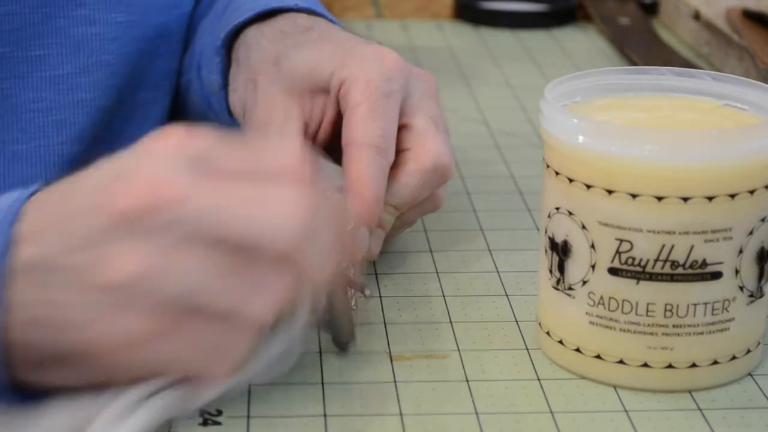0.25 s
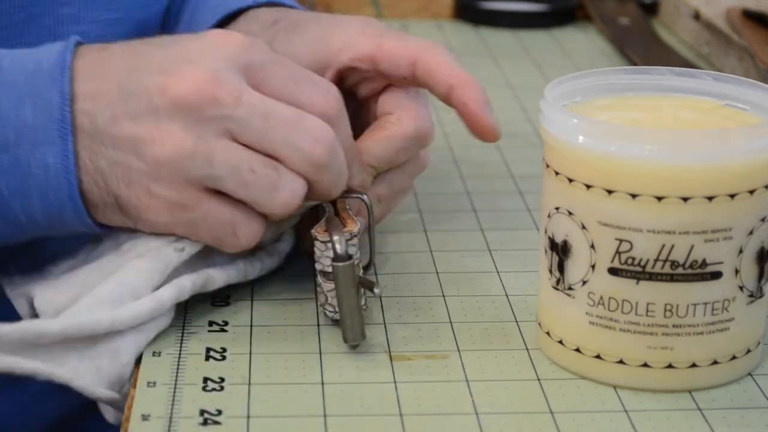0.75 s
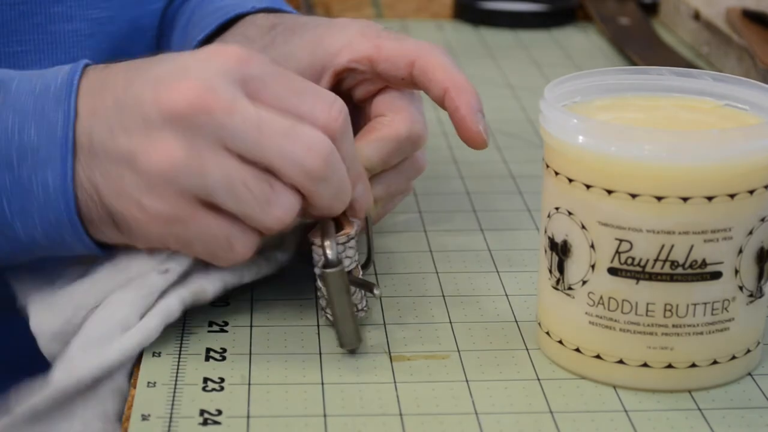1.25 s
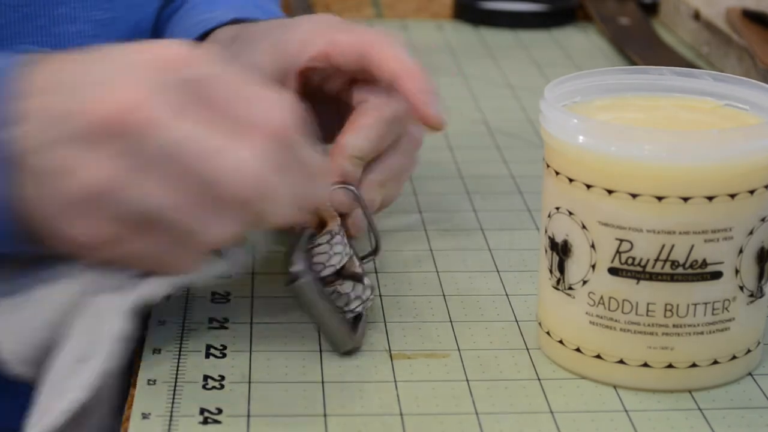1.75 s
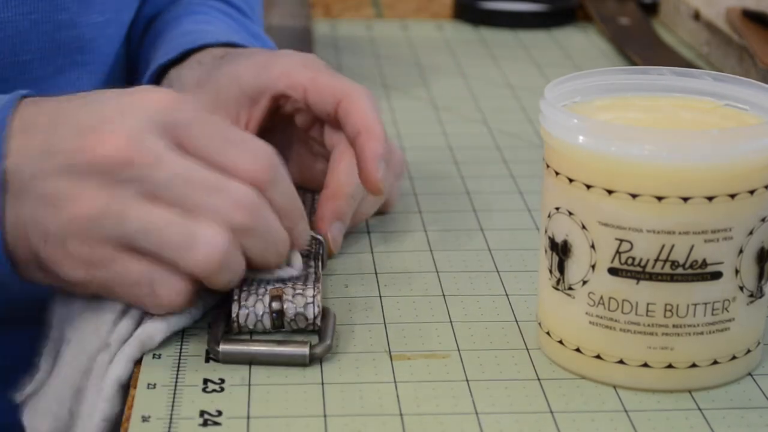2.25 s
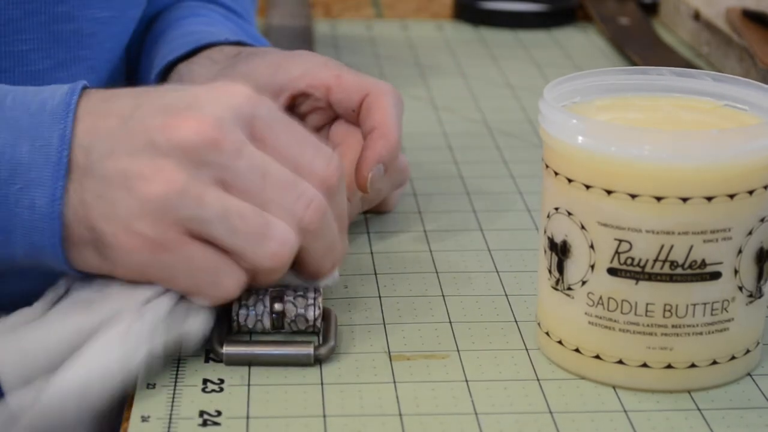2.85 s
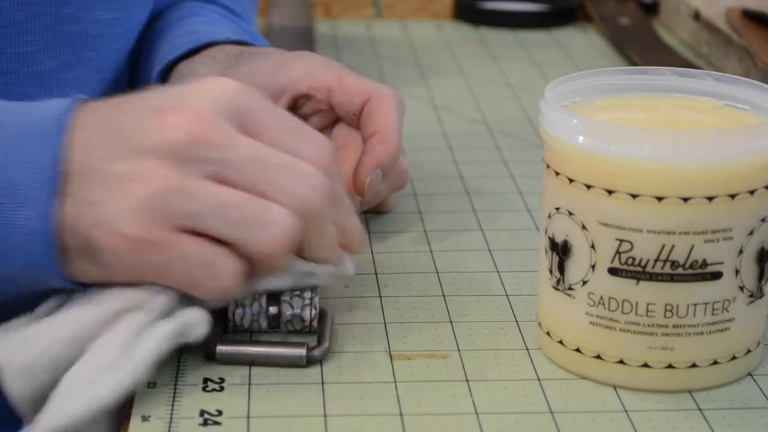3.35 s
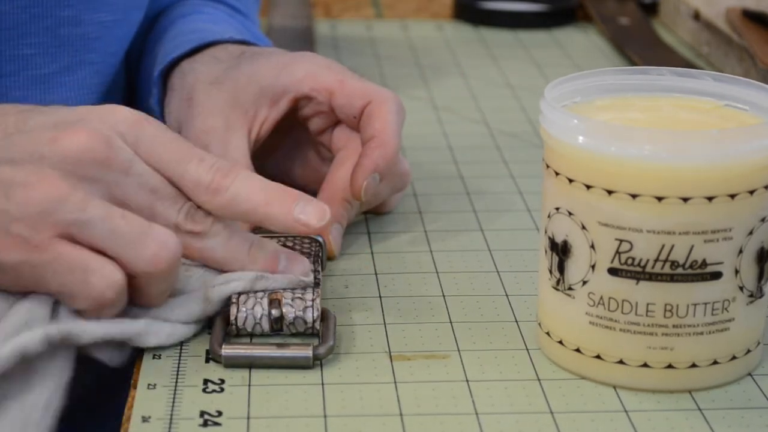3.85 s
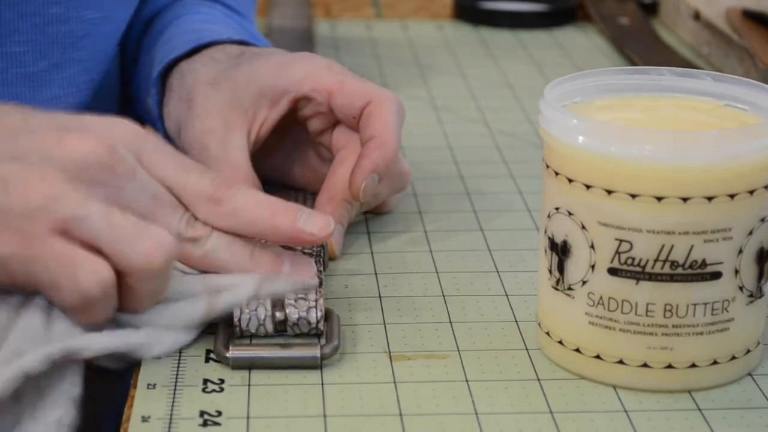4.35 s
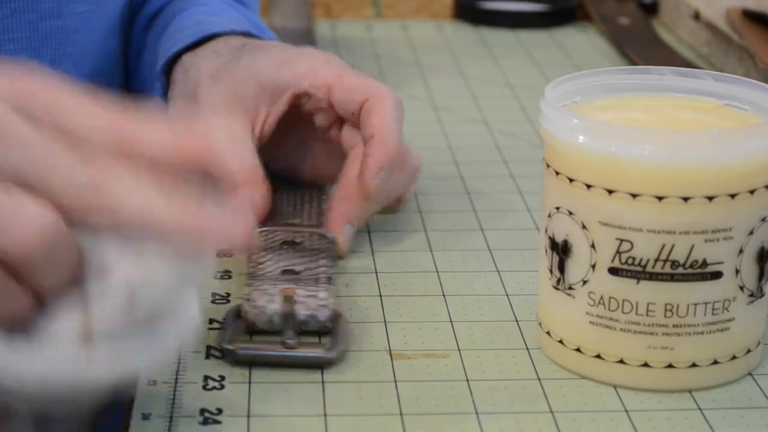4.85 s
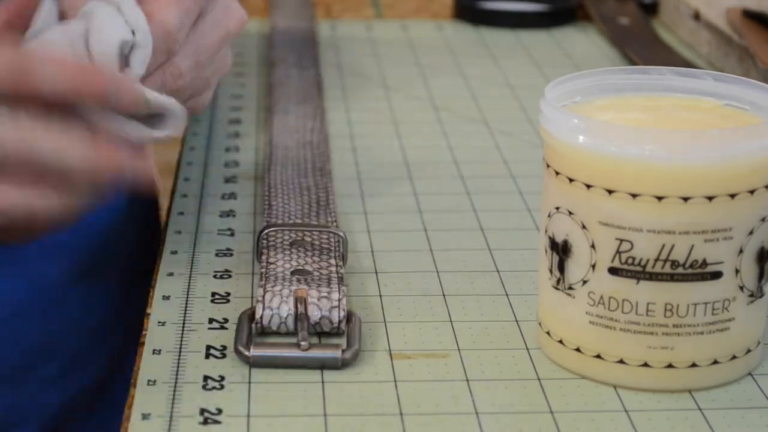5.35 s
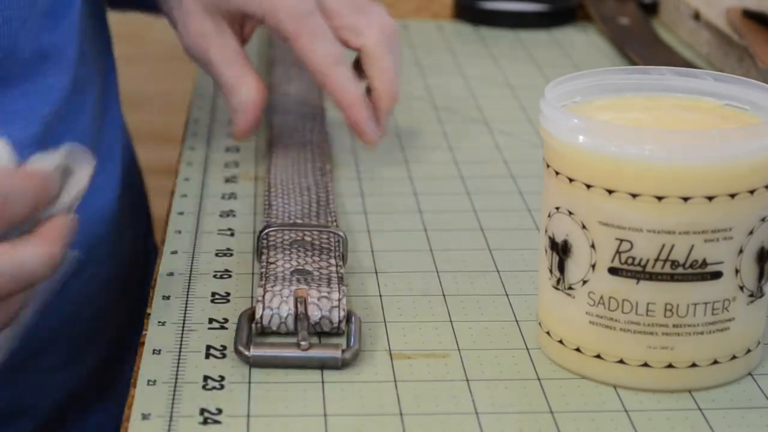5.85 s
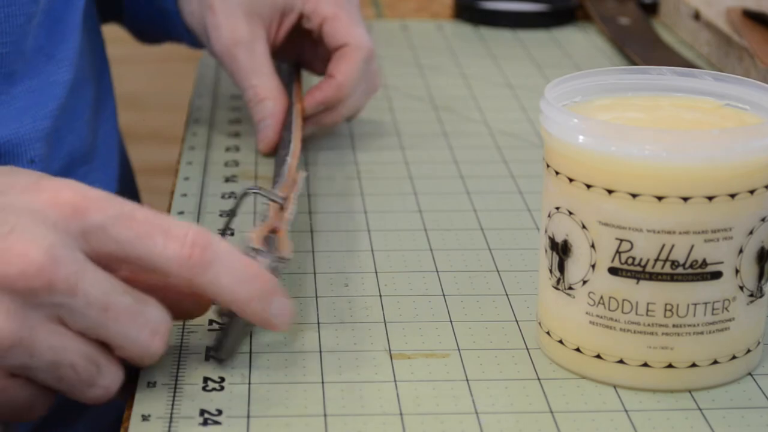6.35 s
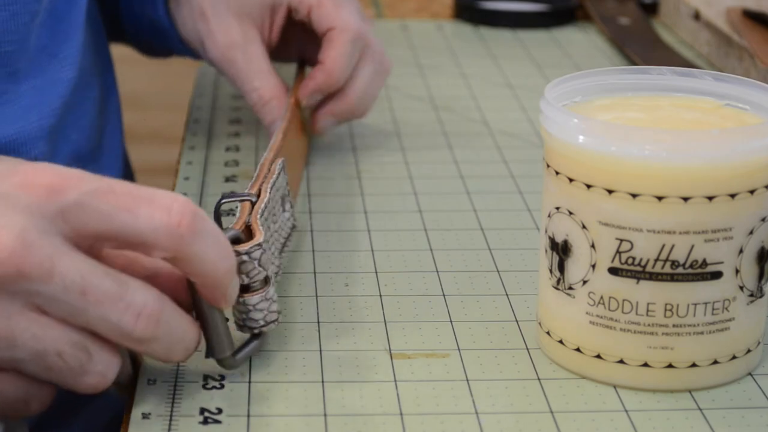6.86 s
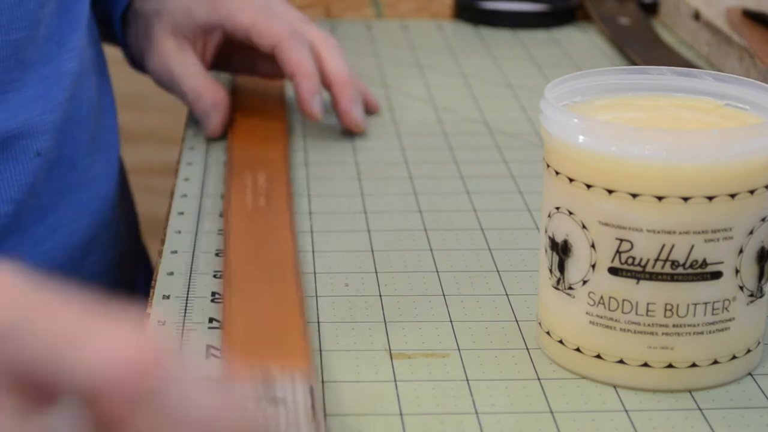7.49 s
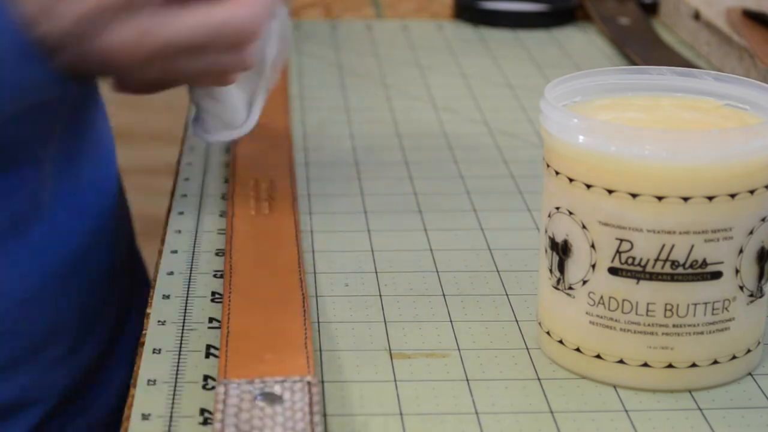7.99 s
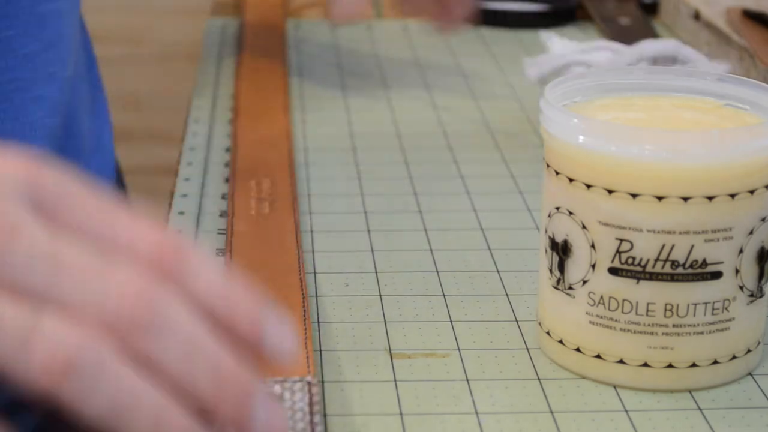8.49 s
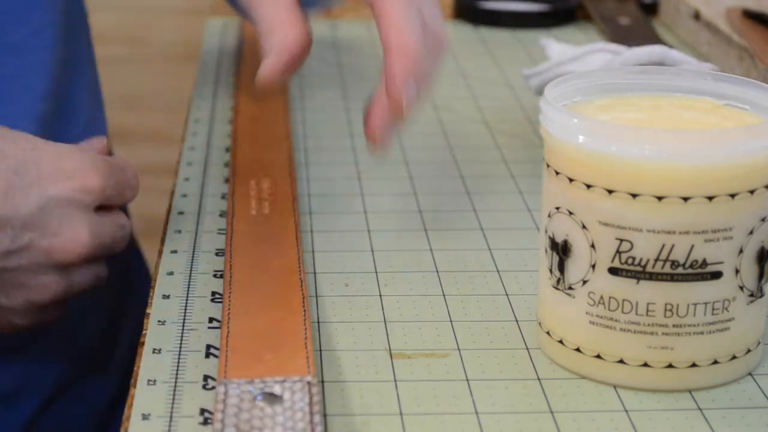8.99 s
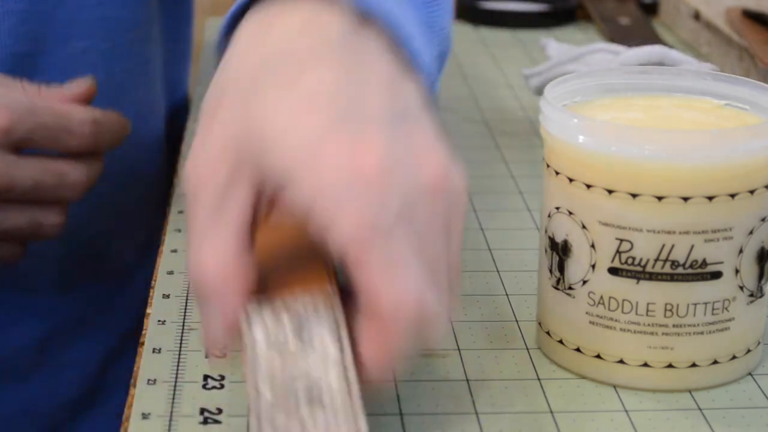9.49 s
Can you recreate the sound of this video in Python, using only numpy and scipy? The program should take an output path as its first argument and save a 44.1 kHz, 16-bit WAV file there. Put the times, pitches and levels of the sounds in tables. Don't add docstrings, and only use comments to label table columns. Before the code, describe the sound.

Close, slightly muffled tabletop handling: a leather belt with a loose steel buckle is wiped by cloth. First come a low thump, tiny prong clinks and a crisp knock, then gentle rhythmic rocking taps with faint swishes, dry ticks and wrist bumps. One hard clack ends the wiping. Later the whole belt slaps down in a fast cluster, then soft scraping and small knocks. Fan noise continues throughout with a very faint high whine.

```python
import sys
import numpy as np
from scipy import signal
from scipy.fft import rfft, irfft, next_fast_len
from scipy.io import wavfile
from scipy.ndimage import uniform_filter1d, map_coordinates

SR = 44100
rng = np.random.default_rng(int(sys.argv[2]) if len(sys.argv) > 2 else 0)


def volts_from_db(level):
    exponent = np.asarray(level, float) / 20
    return 10 ** exponent


def bounce(signal):
    frames = np.transpose(np.atleast_2d(signal))
    limited = np.clip(frames, -1, 1)
    pcm = np.round(limited * 32767).astype(np.int16)
    wavfile.write(sys.argv[1], SR, pcm)


N = 429093

LAG_S = 0.0014

# (time [s], knock peak [dB], contact pitch [Hz], metal snap [dB], swish [dB])
WIPES = [
    (2.477, -45, 1030, 2, -73),
    (2.656, -33, 1100, -4, -75),
    (2.852, -24.5, 1520, -5.5, -71),
    (3.031, -26.5, 1150, -0.5, -77),
    (3.194, -28.5, 1530, -4.5, -75),
    (3.7825, -27, 1360, -2.5, -73),
    (3.9643, -25.5, 1400, -3, -73),
    (4.163, -22, 1400, -2, -71),
]


def knocks():
    # (pitch [Hz], width [Hz], level [dB])
    table_modes = [(150, 60, -4), (215, 60, 0), (280, 60, 0), (365, 80, -6), (490, 100, -7)]
    # (pitch [Hz], width [Hz], level [dB])
    mat_modes = [(1555, 58, 1.5), (2390, 160, -38), (1060, 140, -4.5)]
    # (time [s], snap pitch [Hz], snap width [Hz], crack tilt [dB/octave])
    seating = [(0.25, 2800, 1900, -4), (1.09, 3520, 905, -13), (1.65, 2320, 1900, -6),
               (1.92, 2530, 1920, -8), (1.97, 3500, 1600, -0.5), (2.66, 3270, 1100, 0),
               (2.85, 3400, 900, -1), (3.03, 3200, 1500, -0.5), (3.35, 3200, 1300, -1.5),
               (3.78, 3260, 1201, -2), (3.96, 3260, 1100, -2), (4.16, 3130, 800, 3.5),
               (4.43, 3020, 1000, 0), (6.1, 3200, 1400, 0), (7.55, 2780, 1880, -7), (7.59, 3560, 1900, 2.5),
               (7.62, 3000, 1894, -5), (9.5, 3100, 2200, -5)]
    out, f = np.zeros(N), np.fft.rfftfreq(16384, 1 / SR)

    def low_pass(hz, damping):
        return 1 / (1 - (f / hz) ** 2 + 1j * damping * f / hz)

    capsule = low_pass(3900, 0.8) ** 2
    ringing = capsule * (1 + body(f, mat_modes))
    thud = peak(body(f, table_modes) * resonance(f, 280, 600))
    humps = 1 + 0.464 * resonance(f, 11700, 1525) + 0.7 * resonance(f, 7800, 790)
    humps = humps + 1.2 * resonance(f, 5900, 870) + 0.67 * resonance(f, 15300, 1200)
    broad = resonance(f, 7000, 20000) * resonance(f, 10000, 24000) * humps
    seat_s, *seat_columns = np.transpose(seating)

    for s, db, hz, thud_db, snap_db, crack_db, gap in contacts():
        snap_hz, width_hz, tilt_db = (np.interp(s, seat_s, c) for c in seat_columns)
        contact = resonance(f, hz, 0.96 * hz) * low_pass(2.14 * hz, 1.69) ** 2
        blow = peak(contact * ringing) + volts_from_db(thud_db - 3) * thud
        snap = peak(resonance(f, snap_hz, width_hz) ** 2 * low_pass(snap_hz + width_hz / 2, 1.0) ** 2)
        crack = peak(broad * (1j * (f + 3000) / 11000) ** (tilt_db / 4))
        snap = signal.fftconvolve(snap, chatter(spacing_s=0.0012, loss_db=-8))[:len(blow)]
        crack = signal.fftconvolve(crack, chatter(spacing_s=0.0035, loss_db=-7))[:len(blow)]

        sound = room(blow, wet_db=2.5, echo_db=-9.5)
        sound = sound + room(volts_from_db(snap_db + 0.5) * snap, wet_db=-12.5, echo_db=-15)
        sound = sound + room(volts_from_db(crack_db - 8) * crack, wet_db=-2, echo_db=-10)
        mirror = irfft(1 - gap * resonance(f, 2300, 900))[:SR // 100]
        add(out, s + LAG_S, volts_from_db(db - 0.46) * signal.fftconvolve(sound, mirror))
    return out


def contacts():
    # (time [s], peak [dB], contact pitch [Hz], metal snap [dB])
    nudges = [(0.337, -36.5, 960, -2), (0.732, -39, 896, -14), (1.0866, -33, 1500, -4.5),
              (1.652, -36.5, 1000, 2), (1.847, -38, 931, -24), (1.871, -30, 1540, -15),
              (1.884, -33, 1060, 1), (1.897, -37, 1490, 3), (1.9651, -31, 1500, -9),
              (1.971, -19.5, 1440, -5), (2.012, -27.5, 1710, -18), (3.0801, -33, 1020, -12),
              (3.26, -40.5, 536, -7), (3.78, -36, 930, 3), (3.961, -30.5, 1200, -12),
              (4.376, -35.5, 1040, -5.5), (4.8054, -35.5, 934, -13), (5.943, -37, 1000, -20),
              (6.097, -37.5, 1680, 3), (6.137, -34.5, 1480, -10), (9.232, -35, 1260, -24),
              (9.47, -35.5, 980, -2), (9.539, -29.5, 1600, -7), (9.569, -34, 1000, -8),
              (9.588, -49, 829, -5)]
    # (time [s], peak [dB], contact pitch [Hz], metal snap [dB], crack [dB])
    edge_drops = [(0.2468, -13.5, 572, -43, -40), (0.2576, -30, 494, -30, -33),
                  (1.924, -12, 1300, -0.5, -2), (1.9266, -11.5, 1790, -0.5, -12),
                  (1.9278, -22, 2020, -21, 4.5), (1.9339, -17.5, 1900, -21, -22), (1.974, -33, 2030, -6, 3),
                  (1.979, -28, 1080, -4, -8), (1.982, -23, 1980, -10, -9), (2.668, -35.5, 1320, -18, -20),
                  (3.342, -29, 1570, -4.5, -11), (3.362, -25.5, 1200, -9.5, -12),
                  (4.426, -50, 2500, -20, 2), (4.434, -11, 1320, -6, -5.5), (4.4384, -18, 1350, -24, -8)]
    # (time [s], peak [dB], contact pitch [Hz], metal snap [dB], crack [dB])
    slam = [
        (7.55, -13, 1350, 0.5, -6),
        (7.58, -23, 1200, -11, -11),
        (7.5838, -33, 2500, -14, 8),
        (7.591, -17.5, 880, 11.5, 7),
        (7.5953, -9, 1930, -24, -24),
        (7.616, -18, 1900, -14, -20),
    ]
    flat_gap, edge_gap = 0.8, 0.12
    out = []
    for s, db, hz, snap_db, *_ in nudges + WIPES:
        thud_db = -51.5 - db + 0.29 * (db + 30)
        out.append((s, db, hz, thud_db, snap_db, snap_db - 9, flat_gap))
    for s, db, hz, snap_db, crack_db in edge_drops:
        out.append((s, db, hz, -21.5, snap_db, crack_db, edge_gap))
    for s, db, hz, snap_db, crack_db in slam:
        thud_db = -19 if s < 7.585 else -12
        out.append((s, db, hz, thud_db, snap_db, crack_db, edge_gap))
    return out


def chatter(spacing_s, loss_db):
    touches, skips = np.zeros(SR // 40), np.arange(1, 4)
    gaps_s = spacing_s * rng.uniform(0.3, 1.8, size=3)
    places = np.minimum(np.cumsum(gaps_s) * SR, len(touches) - 1).astype(int)
    touches[places] = volts_from_db(loss_db * skips) * rng.choice([-1, 1], size=3)
    touches[0] = 1
    return touches


def rings():
    # (time [s], pitch [Hz], level [dB], 60 dB decay [s])
    single_modes = [(0.25, 510, -22, 0.034), (0.2484, 1000, -26, .015), (0.282, 480, -32, .05),
                    (0.305, 433, -35, .07), (0.26, 350, -26.5, 0.089), (1.926, 610, -24.5, 0.039),
                    (1.9285, 2320, -25, 0.048), (1.934, 2000, -31, .05), (2.0, 1800, -37, .12),
                    (1.927, 1560, -25, .06), (1.92, 6050, -33.5, .02), (2.8535, 10600, -45, 0.0034),
                    (2.854, 5200, -42, .006), (2.8535, 1540, -31.5, 0.04), (3.0505, 3500, -43, .012),
                    (3.3635, 3000, -43, .015), (3.3635, 12700, -52, .008), (1.088, 9800, -52, .01),
                    (3.082, 1060, -42, .06), (3.2, 1530, -40, 0.048), (3.784, 1500, -46, .04),
                    (3.9666, 1640, -35, .045), (4.1649, 1530, -25.5, 0.037), (4.4367, 2700, -26, 0.025),
                    (4.4357, 12300, -35, .014), (4.4, 7800, -47, 0.036), (7.5848, 12600, -37, .04),
                    (7.552, 530, -28, 0.093), (7.593, 957, -27, .04), (7.597, 760, -30, 0.066),
                    (7.594, 260, -22.5, .06), (7.607, 230, -23.5, .06), (7.635, 520, -34, .12),
                    (7.668, 227, -36, .08), (7.593, 14300, -29, .008)]
    out, t = np.zeros(N), np.arange(SR // 8) / SR
    for s, hz, db, t60 in single_modes:
        ring = volts_from_db(db - 60 * t / t60) * np.sin(2 * np.pi * hz * t)
        add(out, s, room(ring, wet_db=-5, echo_db=-14.5))
    return out


def clinks():
    # (time [s], prong [dB], prong pitch as seated [Hz], frame [dB])
    prong_touches = [(.0413, -70, 6000, -80), (.2454, -80, 5700, -66), (.2613, -66, 5720, -66),
                     (.2942, -70, 5890, -80), (.3366, -57, 6062, -51), (.3444, -62, 5712, -70),
                     (1.0864, -72, 6050, -64), (1.1044, -74, 6100, -68), (1.266, -71, 6080, -72),
                     (1.3159, -72, 6050, -62), (1.3394, -74, 6080, -85), (1.3843, -74, 5760, -85),
                     (1.508, -75, 5900, -80), (1.53, -78, 6080, -72), (1.704, -82, 5900, -68),
                     (1.735, -75, 6050, -85), (1.7774, -85, 5700, -63), (1.79, -73, 5730, -72),
                     (1.8771, -68, 6060, -61), (1.8966, -72, 5800, -75), (1.9284, -52, 5950, -66),
                     (1.9824, -72, 6100, -70), (6.1684, -75, 5710, -90), (6.215, -78, 5720, -90),
                     (6.2527, -72, 6150, -74), (7.5428, -62, 6060, -80), (7.5834, -66, 6200, -60)]
    # (pitch [Hz], 70 dB decay [s])
    steel_parts = [(7860, .1), (8560, .085), (12850, .07)]
    # (time [s], level [dB])
    roller_taps = [
        (.2454, -62),
        (1.704, -70),
        (1.79, -66),
        (1.8966, -66),
        (1.9284, -62),
        (1.9824, -58),
        (3.364, -72),
        (7.5834, -64),
    ]
    # (time [s], level [dB])
    pin_taps = [
        (1.0864, -76),
        (1.9284, -64),
        (3.364, -75),
        (4.434, -58),
        (6.1165, -63),
        (7.5834, -47),
        (7.592, -50),
    ]
    out, t = np.zeros(N), np.arange(SR // 5) / SR
    roller, frame, pin = steel_parts
    touches = [(s, db + 3, hz, 0.085) for s, db, hz, _ in prong_touches]
    touches += [(s, db, *frame) for s, *_, db in prong_touches]
    touches += [(s, db, *roller) for s, db in roller_taps]
    touches += [(s, db, *pin) for s, db in pin_taps]
    for s, db, hz, t60 in touches:
        detune, phase = rng.normal(0, 0.0024), rng.uniform(0, 2 * np.pi)
        waver = np.cumsum(0.09 * rng.standard_normal(len(t)))
        pair = np.sin(2 * np.pi * hz * t + waver)
        pair = pair + 0.55 * np.sin(2 * np.pi * hz * (1.012 + detune) * t + phase)
        onset = 1 - np.exp(-t / 0.00017)
        add(out, s + LAG_S / 2, volts_from_db(db + 1.5 - 70 * t / t60) * pair * onset)
    return out


def cloth():
    # (frequency [Hz], level [dB])
    colour = [(2500, -28), (5000, -9), (8000, -3), (11000, -1), (14000, -2), (16000, -6)]
    fibres = rng.standard_normal(N) + 4 * grains(rate=700, spread_db=1.5)
    hiss = patchy(noise(lambda f: volts_from_db(along(colour, f)), fibres), depth_db=2.5)
    return swells(strokes()) * volts_from_db(-0.5 + 2.3 * wobble(40)) * hiss


def strokes():
    # (time [s], level [dB], length [s])
    swishes = [(0.03, -71, 0.056), (0.3, -76, 0.08), (0.497, -80, 0.046), (0.874, -77, 0.059),
               (1.098, -69, 0.031), (1.309, -72, 0.049), (1.519, -74, 0.056), (1.716, -76, 0.039),
               (1.875, -80, 0.05), (3.66, -77, 0.077), (4.336, -78, 0.029), (4.444, -81, 0.042),
               (4.741, -78, 0.07), (5.551, -78, 0.05), (5.992, -82, 0.058), (6.188, -83, 0.038),
               (6.996, -72, 0.028), (7.335, -77, 0.026), (7.401, -72.5, 0.027), (7.499, -70, 0.03),
               (7.593, -67, 0.12), (9.644, -73, 0.035)]
    push_s = 0.043
    pushes = [(row[0] - 0.0091, row[-1], push_s) for row in WIPES]
    pulls = [(s + 0.09, db - 4.5, length) for s, db, length in pushes]
    return swishes + pushes + pulls


def strap_drag():
    # (time [s], effort [dB])
    effort = [
        (0, -66),
        (2, -61.5),
        (4.4, -61.5),
        (4.6, -64.5),
        (5.7, -66),
        (6.2, -67),
        (7.7, -60.5),
        (9.35, -67.5),
        (9.73, -64.5),
    ]
    # (time [s], level [dB], length [s])
    jerks = [(.03, -52.5, 0.066), (1.87, -48, 0.023), (3.09, -59, 0.015), (4.71, -47, 0.03),
             (4.76, -57, 0.04), (4.81, -66, 0.013), (6.0, -59, 0.045), (6.15, -53.5, 0.12),
             (9.22, -55, 0.045), (9.38, -48.5, 0.063), (9.46, -53, 0.031), (9.56, -46.5, 0.066)]
    # (frequency [Hz], level [dB])
    colour = [(150, 2.5), (400, 8), (1000, -1.5), (2000, -1.5), (4000, -15.5), (6000, -30.5), (16000, -82)]
    scrape = rng.standard_normal(N) + 7 * grains(rate=250, spread_db=2)
    gain = (volts_from_db(curves(effort)[0] + 5.5) + swells(jerks)) * volts_from_db(2.3 * wobble(30))
    return gain * noise(lambda f: volts_from_db(along(colour, f)), scrape)


def table_bumps():
    # (time [s], level [dB], length [s])
    jolts = [(0.02, -52, 0.06), (0.283, -42, 0.074), (1.115, -47, 0.065), (1.329, -49.5, 0.071),
             (1.537, -43, 0.051), (1.722, -51, 0.052), (1.95, -47, 0.052), (4.747, -51.5, 0.053),
             (7.601, -64, 0.12), (9.42, -52, 0.08), (9.66, -60, 0.06)]
    turn = 2 * np.pi * np.cumsum(68 + 14 * wobble(17)) / SR
    return volts_from_db(-3) * swells(jolts) * np.sin(turn)


def ticks():
    # (time [s], peak [dB], pitch [Hz])
    clicks = [(0.0212, -50, 8600), (0.0405, -53, 7100), (0.1748, -63, 10100), (0.2509, -42, 7960),
              (0.2592, -42, 8400), (0.2867, -49, 8400), (0.2923, -49, 8000), (0.3705, -48, 9200),
              (0.5207, -59, 7700), (0.556, -59, 10500), (0.7295, -61, 10600), (1.3113, -48, 7000),
              (1.3827, -56, 8600), (1.5019, -58, 6900), (1.5236, -52, 6200), (1.7048, -53, 7900),
              (1.854, -65, 10800), (2.0225, -51, 7300), (2.4951, -54, 6400), (2.5905, -59, 6800),
              (2.619, -58, 5200), (2.669, -47, 6700), (2.917, -62, 5400), (2.9534, -55, 6300),
              (3.0491, -47, 6600), (3.7687, -54, 8800), (4.0125, -59, 9900), (4.1419, -51, 9400),
              (4.4252, -55, 8500), (4.6894, -55, 6500), (4.7383, -59, 5300), (4.9018, -53, 6100),
              (4.9414, -59, 7400), (5.5179, -60, 6200), (5.5561, -57, 6400), (6.1157, -51, 7500),
              (6.2524, -58, 6800), (6.3149, -62, 8200), (6.7912, -56, 7800), (6.9927, -51, 11700),
              (7.3251, -54, 10400), (7.3662, -55, 5400), (7.3896, -55, 9900), (7.4136, -61, 12100),
              (7.5026, -51, 7800), (7.5426, -38, 7800), (7.7071, -55, 5300), (7.7347, -57, 7200),
              (9.2147, -60, 12500), (9.3336, -66, 12300), (9.3626, -50, 6900), (9.385, -57, 11200),
              (9.4854, -61, 8300), (9.5692, -61, 5200), (9.594, -63, 6300), (9.6376, -55, 7100),
              (9.642, -57, 7200), (9.6879, -64, 11900)]
    out, f = np.zeros(N), np.fft.rfftfreq(1024, 1 / SR)
    for s, db, hz in clicks:
        click = peak(resonance(f, hz, 0.8 * hz) ** 2)
        add(out, s + LAG_S, volts_from_db(db + 4.5) * room(click, wet_db=-3, echo_db=-14))
    return out


def squeak():
    # (time [s], pitch [Hz], level [dB])
    glide = [
        (9.0, 960, -104),
        (9.03, 985, -88),
        (9.07, 1030, -91),
        (9.15, 1040, -90),
        (9.2, 1020, -88),
        (9.28, 970, -92),
        (9.33, 890, -90),
        (9.35, 870, -110),
    ]
    hz, db = curves(glide)
    turn = 2 * np.pi * np.cumsum(hz * (1 + 0.002 * wobble(60))) / SR
    overtones = np.zeros(N)
    for k in range(10, 16):
        overtones += volts_from_db(-4 * abs(k - 14) + 5 * wobble(14) - 1) * np.sin(k * turn)
    return volts_from_db(db) * overtones


def fan():
    # (frequency [Hz], level [dB per Hz])
    colour = [(16, -48), (28, -6.5), (54, 4.5), (90, -16), (134, -2), (216, -6.5), (247, -0.5), (275, -6),
              (455, -11), (563, -6), (908, -4.5), (1720, -7), (6150, -39.5), (16000, -47.5)]
    # (pitch [Hz], width [Hz], level [dB])
    room_modes = [(50.3, 4.3, -5), (117.1, 6.5, 10.5), (148.3, 7.8, 10), (198.7, 17, 9.5), (253, 27, 4),
                  (338, 5, 19.5), (456.2, 16, 16), (675.3, 14, 10), (909, 24.1, 7), (995, 206, 6),
                  (1254, 92, 5), (1530, 26, 8), (1654, 12, 11)]

    def gain(f):
        modes_db = sum(db * np.abs(resonance(f, hz, width)) ** 2 for hz, width, db in room_modes)
        return volts_from_db(along(colour, f) + modes_db)

    hum_turn = 2 * np.pi * 40 * np.arange(N) / SR + 0.5 * wobble(3)
    hum = volts_from_db(-81 + 1.5 * wobble(2.4)) * np.sin(hum_turn)
    air = volts_from_db(-48.5 + 0.12 * wobble(2.1) + 0.79 * wobble(16)) * noise(gain)
    return hum + air


def room(x, wet_db, echo_db):
    # (frequency [Hz], 60 dB decay [s])
    decay = [(150, 0.16), (600, 0.21), (2000, 0.15), (5000, 0.12), (14000, 0.088)]
    # (delay [s], level [dB])
    walls = [(.0021, -14), (.0042, -2), (.0063, -9), (.0098, -13), (.0148, -12)]
    hz, t, z = signal.stft(rng.standard_normal(SR // 4), SR, nperseg=256)
    tail = signal.istft(z * volts_from_db(-60 * t / along(decay, hz)[:, None]), SR, nperseg=256)[1]
    tail *= 1 - np.exp(-np.arange(len(tail)) / (0.00058 * SR))
    answer = volts_from_db(wet_db) * tail / np.linalg.norm(tail)
    answer[0] = 1
    for s, db in walls:
        answer[round(s * SR)] += volts_from_db(db + echo_db)
    return signal.fftconvolve(x, answer)


def resonance(f, hz, width_hz):
    return 1j * f * width_hz / (hz * hz - f * f + 1j * f * width_hz)


def body(f, modes):
    return sum((-1) ** k * volts_from_db(db) * resonance(f, hz, w) for k, (hz, w, db) in enumerate(modes))


def peak(response):
    x = irfft(response)
    x = x[:len(x) // 2] * np.linspace(1, 0, len(x) // 2)
    return x / np.abs(x).max()


def noise(gain, source=None):
    m = next_fast_len(N)
    x = rng.standard_normal(N) if source is None else source
    return unit(irfft(rfft(x, m) * gain(np.fft.rfftfreq(m, 1 / SR)), m)[:N])


def grains(rate, spread_db):
    return (rng.random(N) < rate / SR) * rng.standard_normal(N) * volts_from_db(spread_db * rng.exponential(size=N))


def patchy(x, depth_db):
    z = signal.stft(x, nperseg=128)[2]
    field = uniform_filter1d(rng.standard_normal(z.shape), size=5, axis=0)
    field = uniform_filter1d(field, size=7, axis=1)
    return unit(signal.istft(z * volts_from_db(depth_db * unit(field)), nperseg=128)[1][:N])


def swells(rows):
    out = np.zeros(N)
    for s, db, length in rows:
        t = np.arange(-1.5 * length, 1.5 * length, 1 / SR)
        add(out, s + t[0], volts_from_db(db) * np.exp(-2.5 * (t / length) ** 2))
    return out


def wobble(rate):
    return map_coordinates(rng.standard_normal(int(N * rate / SR) + 4), [np.arange(N) * rate / SR])


def curves(rows):
    s, *cols = np.transpose(rows)
    return [np.interp(np.arange(N) / SR, s, c) for c in cols]


def along(points, hz):
    f, v = np.transpose(points)
    return np.interp(np.log(hz + 1), np.log(f + 1), v)


def unit(x):
    return x / np.sqrt(np.mean(x ** 2) + 1e-20)


def add(track, s, x):
    start = round(s * SR)
    part = track[max(start, 0):][:len(x) + min(start, 0)]
    part += x[max(-start, 0):][:len(part)]


def scene():
    buckle = knocks() + rings() + clinks()
    belt_and_hands = cloth() + strap_drag() + table_bumps() + ticks() + squeak()
    return (buckle + belt_and_hands + fan())[None]


def top_cut(x):
    return signal.sosfilt(signal.butter(12, 16520, fs=SR, output="sos"), x)


def record(dry):
    # (pitch [Hz], level [dB])
    whine_tones = [(15671, -81.5)]
    whine = np.zeros(N)
    for hz, db in whine_tones:
        whine += volts_from_db(db + 2.5) * np.sin(2 * np.pi * hz * np.arange(N) / SR + 2.5 * wobble(9))
    treble_cut = signal.ellip(10, 0.5, 80, 16150, fs=SR, output="sos")
    mix = signal.sosfilt(treble_cut, dry + whine) + 0.00069
    return top_cut(mix)


dry = scene()
out = record(dry)
bounce(out)
```